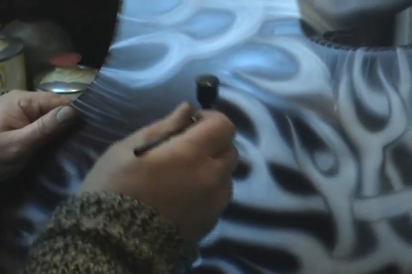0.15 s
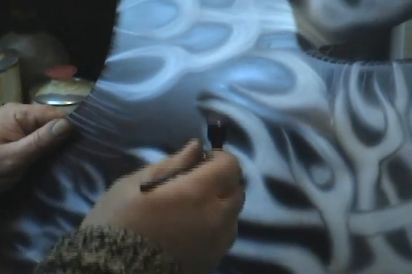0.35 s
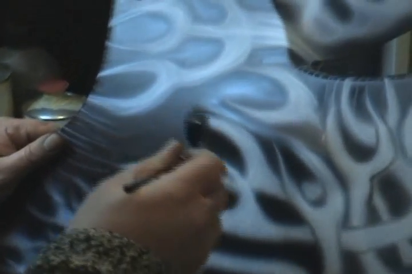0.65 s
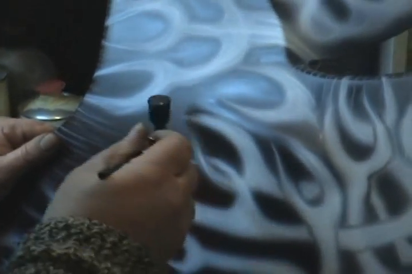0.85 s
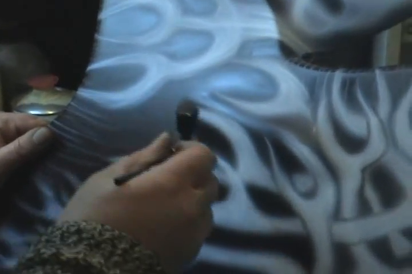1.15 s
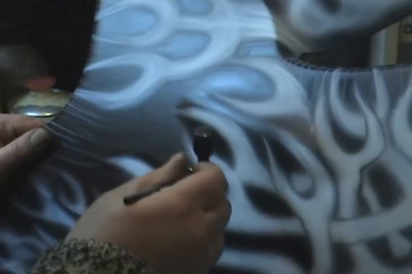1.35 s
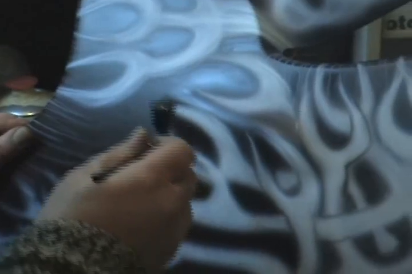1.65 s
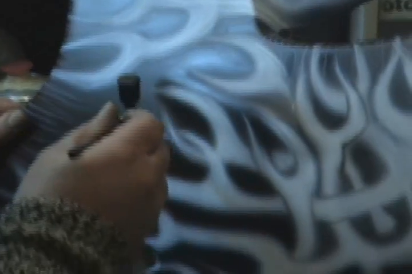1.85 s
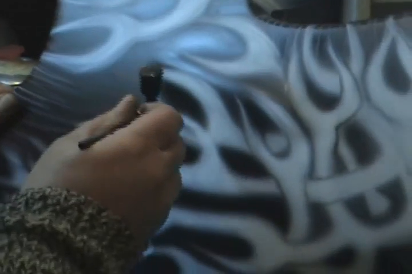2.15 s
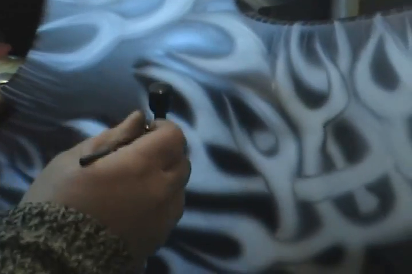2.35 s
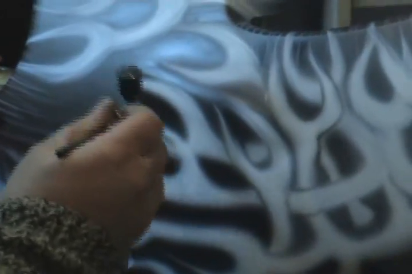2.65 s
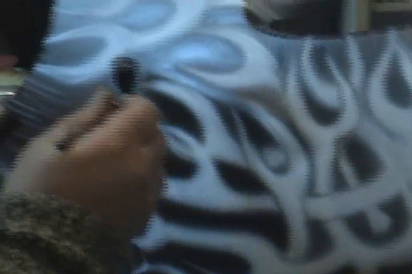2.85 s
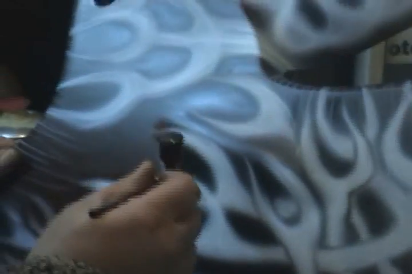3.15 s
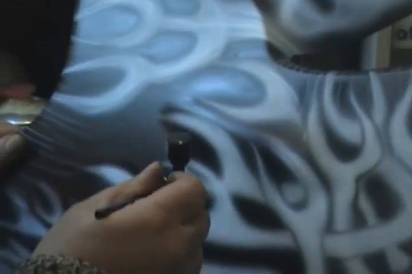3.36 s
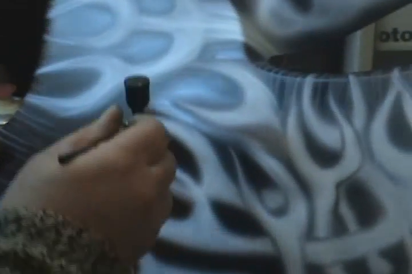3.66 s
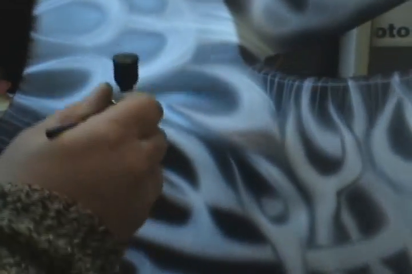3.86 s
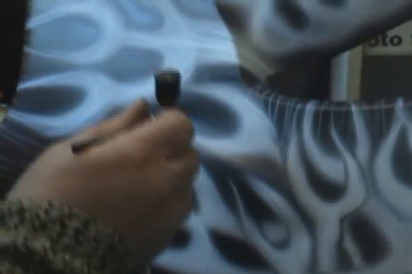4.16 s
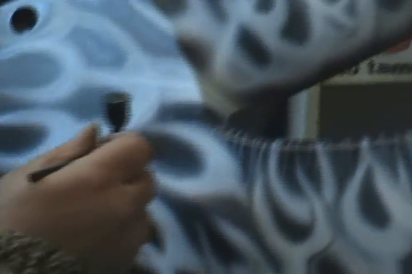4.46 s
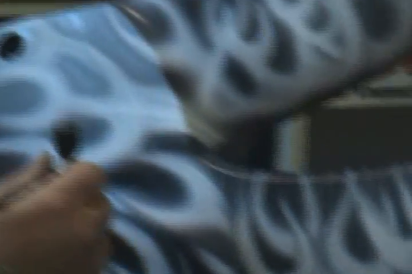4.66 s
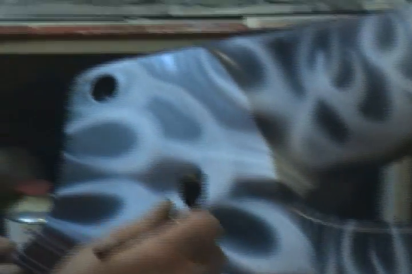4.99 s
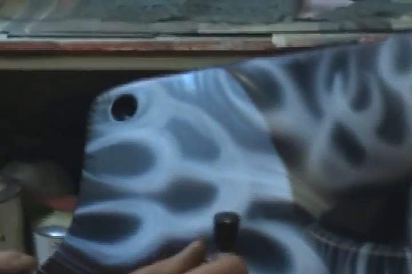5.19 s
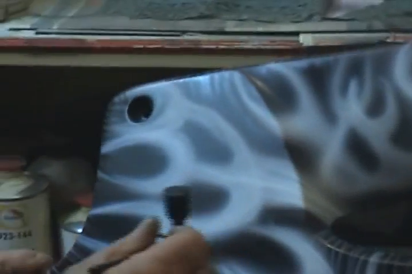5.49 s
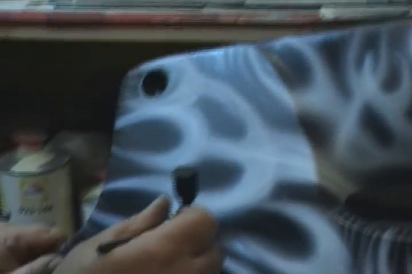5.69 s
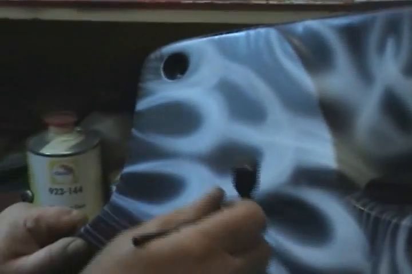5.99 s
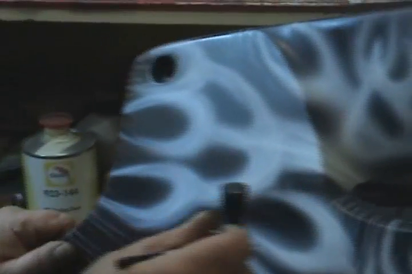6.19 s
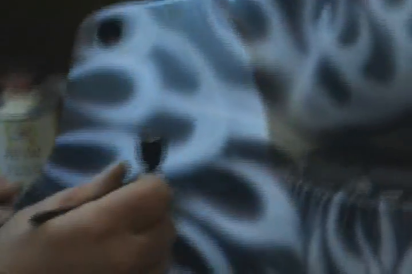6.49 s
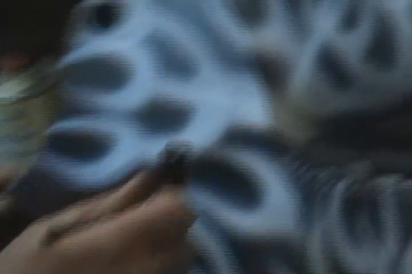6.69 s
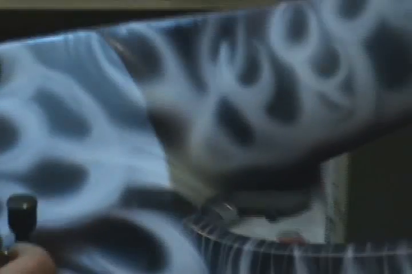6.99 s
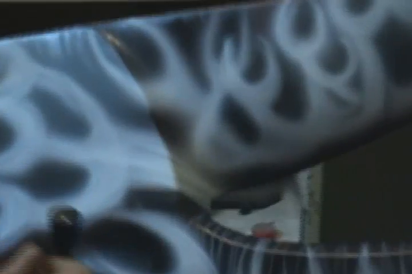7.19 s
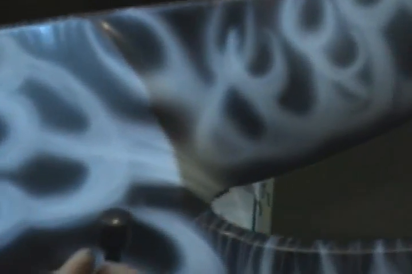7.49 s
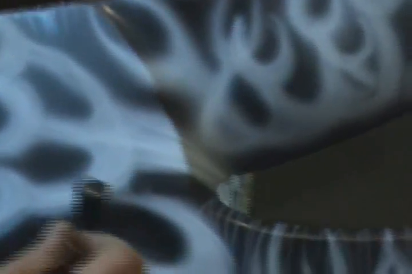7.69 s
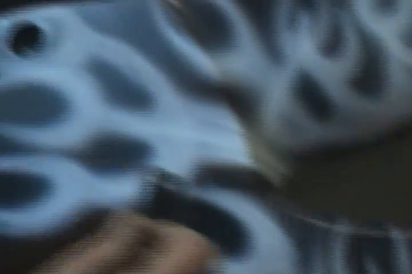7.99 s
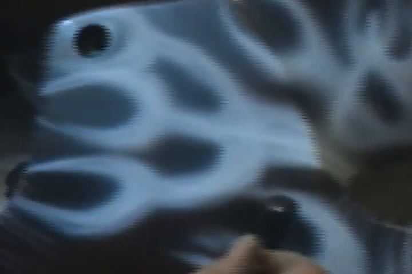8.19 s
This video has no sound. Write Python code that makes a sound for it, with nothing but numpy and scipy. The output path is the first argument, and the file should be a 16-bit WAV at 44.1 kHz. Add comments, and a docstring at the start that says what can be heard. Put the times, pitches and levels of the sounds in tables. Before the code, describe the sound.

Seventeen short, bright airbrush hisses pulse steadily close up, growing louder and longer, over a low fan rush and wavering motor hum in a small workshop.

```python
"""An airbrush paints a curved panel in seventeen short sprays, close to a camera in a small workshop.
Its jet is shaped noise, gated by the trigger; each stroke swings its level and treble, and the panel adds a comb echo.
The valve leaks in thin whistles of narrow noise, and the loose trigger ticks in short noise bursts.
Behind it a fan of resonant noise runs to the right over wavering motor sines, room noise sings in the
hollow of the grip, and knocks on the camera housing ring as damped sines."""
import sys
import numpy as np
from scipy import signal
from scipy.fft import rfft, irfft, next_fast_len
from scipy.io import wavfile
from scipy.ndimage import uniform_filter1d

SR = 44100
rng = np.random.default_rng(int(sys.argv[2]) if len(sys.argv) > 2 else 0)


def digitize_waveform(pressure):
    """Quantize a signal to 16-bit integers and store it at the path in sys.argv[1].

    Rows of a 2-D input are taken as channels; values are limited to [-1, 1].
    """
    field = np.atleast_2d(pressure).T
    bounded = np.clip(field, -1, 1)
    quanta = np.round(bounded * 32767).astype(np.int16)
    wavfile.write(sys.argv[1], SR, quanta)


N = 367785  # length [samples]

# Workshop noise spectrum: (frequency [Hz], relative density [dB per Hz])
SHOP_COLOUR = [(18, -33), (30, -10.5), (208, -3.5), (284, -3), (420, -6), (532, -6.5), (747, -7),
               (1020, -7), (1470, -10), (2300, -16.5), (2550, -19.5), (8280, -26.5), (12300, -30.5),
               (14000, -29), (15500, -38)]
# Stereo likeness of the workshop noise: (frequency [Hz], likeness [0-1])
SHOP_LIKENESS = [(50, 0.98), (150, 0.88), (300, 0.95), (700, 0.78), (1400, 0.57), (3000, 0.87),
                 (12000, 0.42)]
# Level offset between the microphone ports: (frequency [Hz], left minus right [dB])
PORT_BALANCE = [(27, 4), (52, -12), (77, 3), (150, -9.5), (280, -8), (620, -12.5), (1000, -9), (1500, -5.5),
                (3000, -1), (12000, -2.5)]
# Phase offset between the microphone ports: (frequency [Hz], lead of the left [rad])
PORT_PHASE = [(27, -1.4), (115, -1.04), (200, -0.24), (340, 0.5), (500, 1.5), (650, 2), (1000, -0.5),
              (1460, 1.06), (2500, 0.7), (12000, 0.38)]
# Resonances of the fan and its duct: (frequency [Hz], width [Hz], lift [dB])
DUCT_MODES = [(78, 9.2, 0.5), (121, 17, 6), (148, 9.2, 5), (262, 21, 8.5), (302, 20, 5), (372, 19, 3),
              (870, 44, 3), (1440, 130, 2.5)]
# Loudness ride of the fan, before its trim: (time [s], level [dB])
FAN_LEVEL = [(0, -34), (1.5, -33), (3.3, -31), (4.65, -33), (5.6, -32), (7, -29.5), (8.34, -31.5)]
# Steady machine hums: (frequency [Hz], level [dB], pitch waver [Hz], level waver [dB])
MOTOR_HUMS = [(25.6, -44.5, 0.6, 2), (51.7, -50, 2, -1), (77, -53, 0.85, -1.5), (117, -48.5, 2.8, 2.5),
              (200, -48.5, 2.7, 0)]
# Passing swells of a hum: (middle [s], length [s], frequency [Hz], peak level [dB])
HUM_SWELLS = [(1.448, 0.44, 78.5, -45), (2.15, 0.45, 50, -43), (2.5, 0.76, 26.5, -39),
              (2.97, 0.32, 198, -37), (3.35, 0.25, 26.4, -35), (3.75, 0.45, 49, -47), (4.7, 0.43, 52, -44),
              (5.4, 0.35, 199.8, -42), (6.42, 0.25, 75, -40), (6.928, 0.094, 118, -35),
              (7.23, 0.37, 201, -35), (7.8, 0.41, 112.3, -36.5)]
# Air in the hollow between hand and camera, retuned by the grip: (time [s], resonance [Hz], level [dB])
GRIP_HOLLOW = [(0, 516, -47), (2.9, 515, -47.5), (3.8, 520, -58), (4.9, 530, -48), (6.35, 494.6, -41),
               (7.1, 544, -41), (7.4, 631, -46), (8.34, 630, -43)]
# Knocks on the camera housing, level before the trim:
# (time [s], level [dB], ring frequency [Hz], ring t60 [s], thud against ring [dB])
HOUSING_KNOCKS = [(1.4545, -23, 546, 0.12, 10.5), (7.458, -25, 634, .1, -10), (7.525, -24, 654, .1, -10),
                  (7.808, -24, 660, 0.22, -12), (8.061, -22, 647, 0.25, -12),
                  (8.102, -10.5, 634, 0.11, -12), (8.162, -19.5, 635, 0.22, -12),
                  (8.208, -19.5, 643, .15, -12), (8.265, -19, 627, 0.12, -12), (8.332, -22, 622, .1, -14)]
# Reverberation of the workshop: (frequency [Hz], t60 [s])
ROOM_DECAY = [(1000, 0.3), (4000, 0.28), (8000, 0.21), (15000, 0.064)]
# Whistles of the leaking valve:
# (start [s], end [s], frequency [Hz], width [Hz], level [dB], left minus right [dB])
LEAK_WHISTLES = [(0, 5.7, 8140, 110, -54, -8), (0, 6.1, 9600, 140, -67, -8), (0, 6.2, 14330, 45, -55, -17),
                 (0, 5.7, 13950, 300, -63, 0), (5.595, 5.65, 13600, 200, -39, -1),
                 (6.05, 8.34, 11150, 198, -61, -13)]
# Faint trigger ticks, level before the trim: (time [s], level [dB], pitch [Hz])
TRIGGER_TICKS = [(3.229, -30, 2800), (6.136, -39, 3600), (6.16, -34, 4200), (6.186, -37, 3200),
                 (6.203, -31, 3600), (6.214, -36, 4200), (6.24, -39, 3600)]
# One row a spray: (trigger down [s], trigger up [s], valve closing time [s], mid-stroke level [dB],
#   swing = gain from start to end [dB], arch = drop at both ends [dB], body [dB], sizzle [dB],
#   delay of the panel's echo [ms])
SPRAY_STROKES = [(-0.018, 0.233, 0.019, -14, 1, -0.4, 1, 0.5, 0.33),
                 (0.428, 0.697, 0.018, -11.5, -4, 1.7, 0, 1.5, 0.36),
                 (0.892, 1.2, 0.02, -13, 2.5, 0.3, 1.5, 1, 0.33),
                 (1.445, 1.734, 0.02, -11.5, -2, 2.5, 1.2, 1, 0.36),
                 (1.915, 2.202, 0.016, -12.5, 3, 1, -0.3, 1, 0.36),
                 (2.399, 2.663, 0.018, -11.5, -5, 1, -0.5, 1.5, 0.49),
                 (2.85, 3.142, 0.018, -13, 3, 0.5, 1.7, 1, 0.38),
                 (3.326, 3.501, 0.017, -11.5, -5.5, 0.9, -0.5, 1, 0.41),
                 (3.802, 4.07, 0.021, -14.5, 4, 0.5, 5, -1, 0.144),
                 (4.244, 4.52, 0.02, -10.5, 2, 3, 2, -0.5, 0.28),
                 (4.725, 4.989, 0.013, -8.5, 6, 3, -1, 1, 0.32),
                 (5.181, 5.454, 0.019, -7, -2, 2, -2, 1.5, 0.31),
                 (5.655, 6.032, 0.014, -8, 4, 2.5, -2.5, 1, 0.34),
                 (6.278, 6.774, 0.017, -8, 2.2, 2.6, -1.8, 0.5, 0.29),
                 (6.978, 7.32, 0.012, -7.5, 5, 3.5, -1, 0.5, 0.31),
                 (7.449, 7.722, 0.011, -9.1, -3.5, 0.7, 0.5, 0.9, 0.25),
                 (7.861, 8.36, 0.016, -8.5, -1.3, 3, 1.7, -1, 0.51)]
# Basic spectrum of the jet: (frequency [Hz], relative density [dB per Hz])
JET_COLOUR = [(700.0, -20.5), (1400.0, -16.5), (2300.0, -15.5), (3000.0, -13.5), (3700.0, -8.5),
              (5000.0, -6.5), (6000.0, -2.5), (7000.0, 0.27), (10000.0, 0.45), (12700.0, -3), (14200.0, -7),
              (15500.0, -9.5)]
# Stereo likeness of the jet: (frequency [Hz], likeness [0-1])
JET_LIKENESS = [(1000, 0.55), (3000, 1), (6000, 0.91), (9000, 0.89), (15000, 0.88)]
# Resonances of the pocket between nozzle, hand and panel:
# (frequency [Hz], width [Hz], lift on the first patch [dB], lift on the second patch [dB])
POCKET_MODES = [(2400, 470, 2.7, 1.9), (3100, 300, -2, -0.5), (6660, 460, -3, 1), (7400, 860, 2.8, 0.6),
                (8400, 310, -3, 1.5), (10080, 570, 2, 1.1), (11700, 500, -3, 1), (12350, 690, 2, -1.5),
                (13200, 500, -4, 0.5)]
# Where body and sizzle act on the jet: (frequency [Hz], share of the dB setting)
BODY_SHAPE = [(600, 0.56), (2500, 0.59), (4300, 0.58), (7000, 0.037)]
SIZZLE_SHAPE = [(9500, 0.089), (13500, 1.9)]

# The treble beams along the jet, the body spreads all round [dB per dB of swing]
SIZZLE_PER_SWING, BODY_PER_SWING = 0.33, -0.61
MOVE_AT, MOVE_S = 3.3, 0.25  # the brush moves on to a second patch of the panel [s]
EDGE_HZ = 15830  # upper band limit


def gain_of(db):
    """Decibels to amplitude."""
    return 10 ** (np.asarray(db) / 20)


def evened(x):
    """Scales to rms 1."""
    return x / np.sqrt(np.mean(x ** 2) + 1e-20)


def read(points, hz):
    """Reads a table along a log-frequency axis."""
    f, value = np.transpose(points)
    return np.interp(np.log(hz + 1), np.log(f + 1), value)


def follow(rows, t):
    """Reads every column of a curve at the times t."""
    s, *columns = np.transpose(rows)
    return [np.interp(t, s, column) for column in columns]


def panned(balance_db):
    """Left and right gains whose mean is 1."""
    balance_db = np.atleast_1d(balance_db)
    pair = gain_of(np.array([balance_db, -balance_db]) / 2)
    return pair / pair.mean(0)


def add(mix, s, sound):
    """Mixes a sound into both channels at time s."""
    part = mix[:, max(round(s * SR), 0):][:, :sound.shape[1]]
    part += sound[:, :part.shape[1]]


def noise_pair(same, shape):
    """Two random complex spectra that are alike by the share same."""
    a, b, c, d = rng.standard_normal((4,) + shape)
    left = a + 1j * b
    right = same * left + np.sqrt(1 - same ** 2) * (c + 1j * d)
    return np.array([left, right])


def fuzzy_tone(hz, width_hz):
    """Noise in one narrow resonance: a tone that wavers in level and pitch."""
    size = next_fast_len(N)
    f = np.fft.rfftfreq(size, 1 / SR)
    resonance = 1 / (1 + ((f - hz) / width_hz) ** 2) ** 2
    return evened(irfft(rfft(rng.standard_normal(size)) * resonance, size)[:N])


def wander(t, rate_hz):
    """Slow random drift of rms 1: sines of random phase up to the given rate."""
    hz = np.geomspace(rate_hz / 10, rate_hz, 20)[:, None]
    return evened(np.sin(2 * np.pi * (hz * t + rng.random(hz.shape))).sum(0))


def tone(hz, waver_hz):
    """A sine of rms 1 whose pitch wavers slowly."""
    t = np.arange(N) / SR
    slow_t = t[::1000]
    pitch = hz + waver_hz * np.interp(t, slow_t, wander(slow_t, rate_hz=5.4))
    return evened(np.sin(2 * np.pi * np.cumsum(pitch) / SR))


def fan(trim_db=0.5):
    """Rushing air: broad noise lifted by the duct resonances."""
    size = next_fast_len(N)
    hz = np.fft.rfftfreq(size, 1 / SR)
    colour = read(SHOP_COLOUR, hz)
    for f, width, lift_db in DUCT_MODES:
        colour += lift_db / (1 + (2 * (hz - f) / width) ** 2)
    spectra = noise_pair(read(SHOP_LIKENESS, hz), hz.shape) * gain_of(colour)
    level = follow(FAN_LEVEL, np.arange(N) / SR)[0]
    return evened(irfft(spectra, size)[:, :N]) * gain_of(level + trim_db)


def motors(unsteady_hz=3):
    """A deep shaft drone and a few hums; each wavers in pitch and level, and now and then one swells."""
    t, out = np.arange(N) / SR, np.zeros(N)
    slow_t = t[::500]
    for hz, db, waver_hz, waver_db in MOTOR_HUMS:
        level = db + waver_db * np.interp(t, slow_t, wander(slow_t, unsteady_hz))
        out += gain_of(level) * tone(hz, waver_hz)
    for s, length, hz, db in HUM_SWELLS:
        bell = np.exp(-(2 * (t - s) / length) ** 2)
        out += gain_of(db) * bell * tone(hz, waver_hz=2.2)
    return out


def hollow(width_hz=26):
    """Room noise sings faintly in the hollow and follows its resonance."""
    hz, db = follow(GRIP_HOLLOW, np.arange(N) / SR)
    turn = 2 * np.pi * np.cumsum(hz) / SR
    # two slow noises on a quadrature carrier make a narrow band that glides
    air = fuzzy_tone(0, width_hz) * np.cos(turn) + fuzzy_tone(0, width_hz) * np.sin(turn)
    return gain_of(db) * evened(air)


def knocks(thud_hz=760, thud_t60=0.014, damped_s=0.02, trim_db=1):
    """Each knock gives a brief thud and rings the hollow, until the grip damps it."""
    t, out = np.arange(SR // 5) / SR, np.zeros((2, N))
    onset = 1 - np.exp(-t / 0.0008)
    for s, db, hz, t60, thud_db in HOUSING_KNOCKS:
        damping = 1 / (1 + (t / damped_s) ** 8)
        ring = np.sin(2 * np.pi * hz * t) * np.exp(-np.log(1000) * t / t60) * damping
        thud = np.sin(2 * np.pi * thud_hz * t) * np.exp(-np.log(1000) * t / thud_t60)
        knock = (ring + gain_of(thud_db) * thud) * onset
        add(out, s, gain_of(db + trim_db) * knock[None])
    return out


def ports(x):
    """Sounds from the right reach the two microphone ports at unlike level and phase."""
    size = next_fast_len(N + SR // 10)
    hz = np.fft.rfftfreq(size, 1 / SR)
    spectra = rfft(x, size) * panned(read(PORT_BALANCE, hz))
    spectra[0] *= np.exp(1j * read(PORT_PHASE, hz))
    return irfft(spectra, size)[:, :N]


def room(x, wet_db=-13, first_s=0.0031, drift_hz=0.798, count=3):
    """Short diffuse tails, different at each ear, trade places as the moving brush finds new paths."""
    out = np.zeros((2, N))
    for k in range(count):
        hz, t, spectra = signal.stft(rng.standard_normal((2, SR // 2)), SR, nperseg=256)
        decay = gain_of(-60 * t / read(ROOM_DECAY, hz)[:, None]) * (t > first_s)
        tail = signal.istft(spectra * decay, SR)[1]
        tail /= np.linalg.norm(tail, axis=1, keepdims=True)
        share = np.sqrt(2 / count) * np.cos(np.pi * (drift_hz * np.arange(N) / SR + k / count))
        out += signal.fftconvolve(x * share, tail, axes=1)[:, :N]
    return gain_of(wet_db) * out


def leak():
    """Air squeezes past the valve seat in thin whistles."""
    t, out = np.arange(N) / SR, np.zeros((2, N))
    for start, end, hz, width, db, balance in LEAK_WHISTLES:
        fade = np.clip(np.minimum(t - start, end - t) / 0.01, 0, 1)
        out += gain_of(db) * fade * fuzzy_tone(hz, width) * panned(balance)
    return out


def ticks(t60=0.016, spread=1.45, trim_db=-1):
    """Small bright rattles of the loose trigger: decaying bursts of band noise."""
    t, out = np.arange(SR // 10) / SR, np.zeros((2, N))
    for s, db, hz in TRIGGER_TICKS:
        band = signal.butter(2, [hz / spread, hz * spread], "band", fs=SR, output="sos")
        rattle = evened(signal.sosfilt(band, rng.standard_normal(len(t))))
        tick = rattle * np.exp(-np.log(1000) * t / t60)
        add(out, s, gain_of(db + trim_db) * tick[None])
    return out


def valve(t, opening_share=0.25, bleed_db=-27, bleed_s=0.051):
    """Air flow snaps up, then drains on release, both faster under a quick finger; the last air bleeds out."""
    flow, bleed = np.zeros(N), gain_of(bleed_db)
    for down, up, closing, *_ in SPRAY_STROKES:
        since = np.maximum(t - up, 0)
        drain = (np.exp(-since / closing) + bleed * np.exp(-since / bleed_s)) / (1 + bleed)
        opening = (1 + np.tanh((t - down) / (2 * opening_share * closing))) / 2
        flow += opening * drain
    return flow


def strokes(t):
    """One hand sweep a spray: level arches and swings, colour follows; gives three dB curves and echo ms."""
    rows = np.array(SPRAY_STROKES)
    # each stroke's settings take over 50 ms before its trigger goes down
    current = np.maximum(np.searchsorted(rows[:, 0], t + 1 / 20) - 1, 0)
    down, up, _, level, swing, arch, body, sizzle, delay_ms = rows[current].T
    place = np.clip((t - down) / (up - down), 0, 1) - 0.5
    aim = swing * place
    level = level + aim - arch * (2 * place) ** 2
    return level, body + BODY_PER_SWING * aim, sizzle + SIZZLE_PER_SWING * aim, delay_ms


def pocket(t, hz):
    """Colour [dB] of the air pocket in front of the nozzle; it changes when the brush moves on."""
    first, second = np.zeros(len(hz)), np.zeros(len(hz))
    for f, width, first_db, second_db in POCKET_MODES:
        resonance = 1 / (1 + (2 * (hz - f) / width) ** 2)
        first += first_db * resonance
        second += second_db * resonance
    moved = (1 + np.tanh((t - MOVE_AT) / MOVE_S)) / 2
    return np.outer(1 - moved, first) + np.outer(moved, second)


def near_echoes(t, hz, delay_ms, first=0.05, second=0.04, sway=0.032):
    """The hiss bounces twice between panel and hand: a comb that slides a little as the hand sways."""
    delay_s = delay_ms * (1 + sway * wander(t, rate_hz=4)) / 1000
    bounce = np.exp(-2j * np.pi * np.outer(delay_s, hz))
    return abs(1 + first * bounce + second * bounce ** 2)


def jet(patchy_db=1.3, flutter_db=0.52, balance_db=-0.6):
    """Turbulent nozzle air: body where it strikes the panel, sizzle when it faces the microphone."""
    size, hop = 512, 128  # [samples]
    hz, frame_t = np.fft.rfftfreq(size, 1 / SR), np.arange(N // hop + 5) * hop / SR
    level, body, sizzle, delay_ms = strokes(frame_t)
    colour = read(JET_COLOUR, hz) + pocket(frame_t, hz)
    colour += np.outer(body, read(BODY_SHAPE, hz))
    colour += np.outer(sizzle, read(SIZZLE_SHAPE, hz))
    # smoothed random patches over time and frequency keep the colour uneven
    patches = uniform_filter1d(rng.standard_normal(colour.shape), size=40, axis=0)
    patches = evened(uniform_filter1d(patches, size=4, axis=1))
    shape = gain_of(colour + patchy_db * patches) * near_echoes(frame_t, hz, delay_ms)
    # equal power in every frame, so colour leaves the level alone
    shape /= np.linalg.norm(shape, axis=1, keepdims=True)
    shape *= gain_of(flutter_db * wander(frame_t, rate_hz=33))[:, None]
    spectra = noise_pair(read(JET_LIKENESS, hz), shape.shape) * shape
    hiss = signal.istft(spectra.swapaxes(1, 2), nperseg=size, noverlap=size - hop)[1][:, :N]
    t = np.arange(N) / SR
    return evened(hiss) * gain_of(np.interp(t, frame_t, level)) * valve(t) * panned(balance_db)


def scene():
    """The airbrush in its room, over the machines."""
    background = ports(fan() + motors() + hollow() + knocks())
    brush = jet() + ticks()
    return background + leak() + room(brush) + brush


def record(dry):
    """Anything over full scale clips; then a steep low-pass sets the band limit."""
    clipped = np.clip(dry, -1, 1)
    low_pass = signal.firwin(1501, EDGE_HZ, window=("kaiser", 8), fs=SR)
    return signal.oaconvolve(clipped, low_pass[None], "same")


dry = scene()
out = record(dry)
digitize_waveform(out)
```